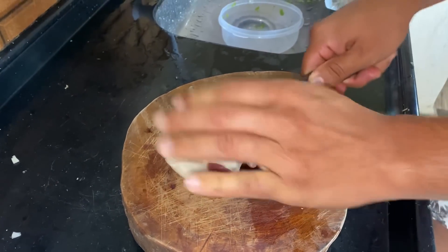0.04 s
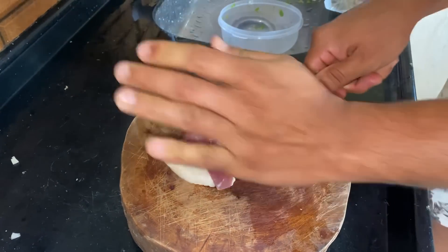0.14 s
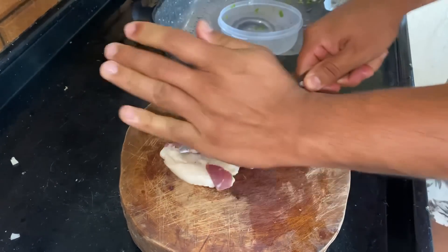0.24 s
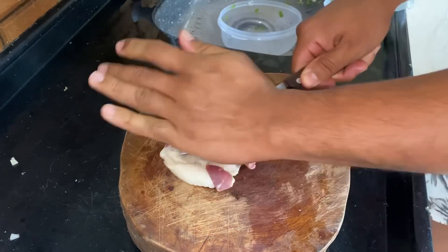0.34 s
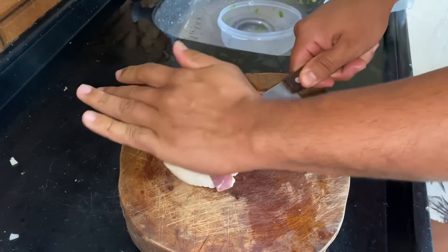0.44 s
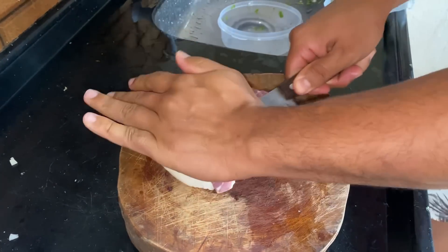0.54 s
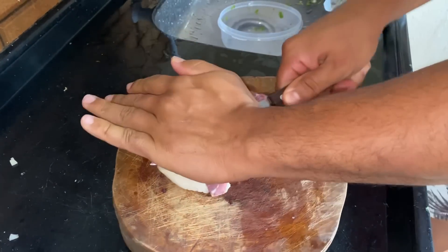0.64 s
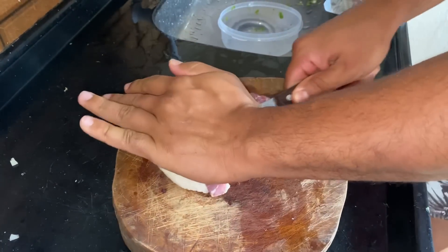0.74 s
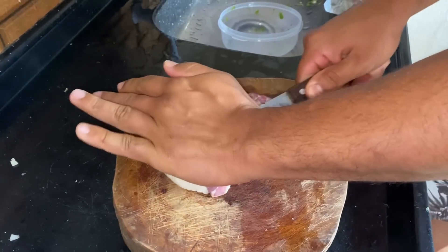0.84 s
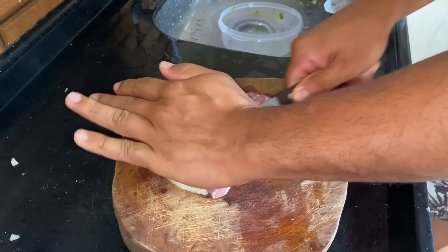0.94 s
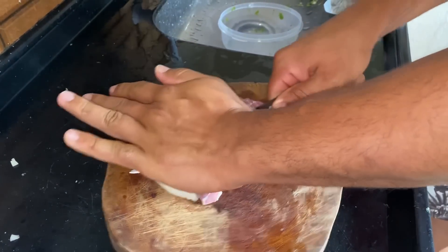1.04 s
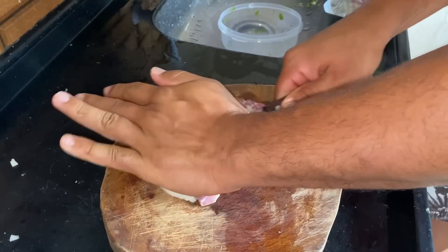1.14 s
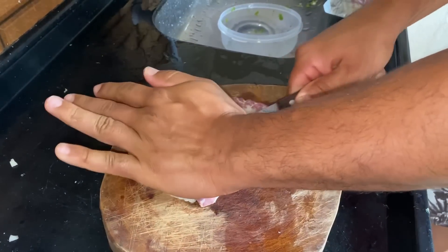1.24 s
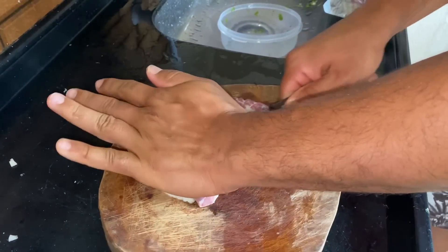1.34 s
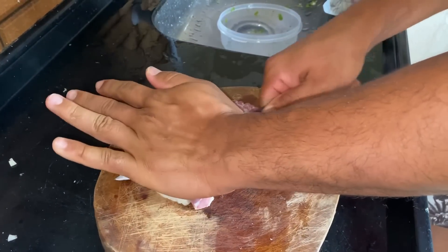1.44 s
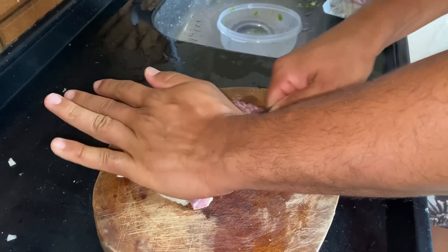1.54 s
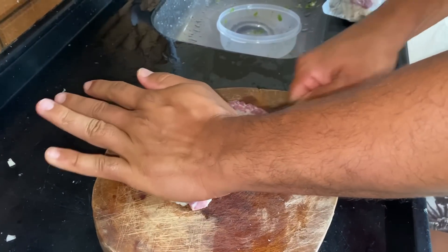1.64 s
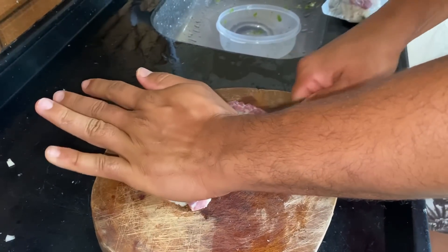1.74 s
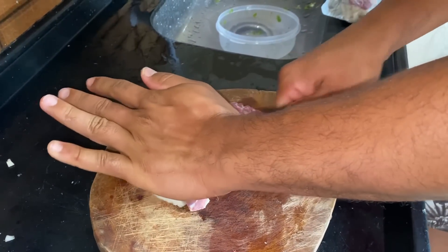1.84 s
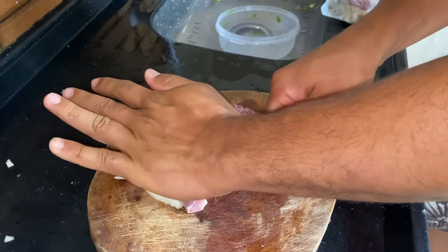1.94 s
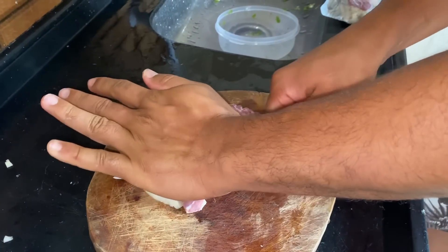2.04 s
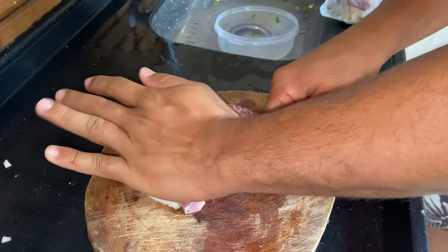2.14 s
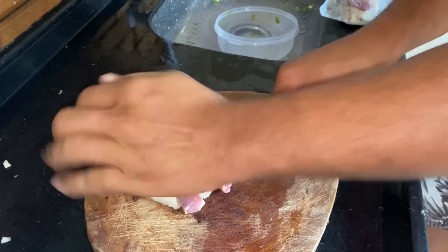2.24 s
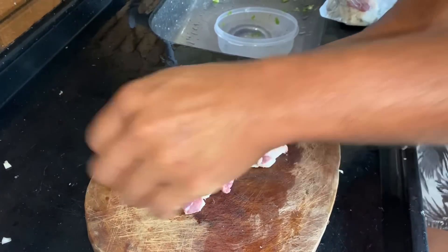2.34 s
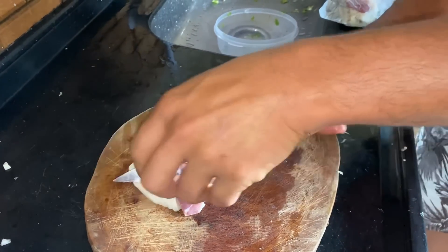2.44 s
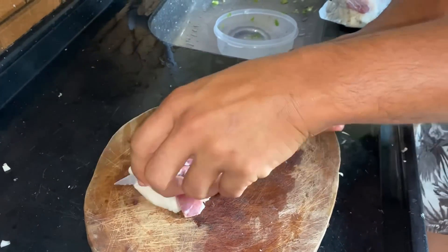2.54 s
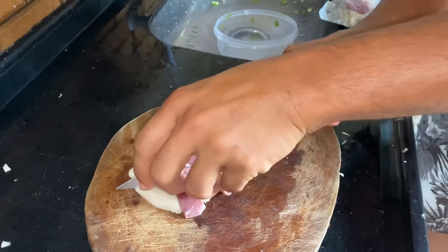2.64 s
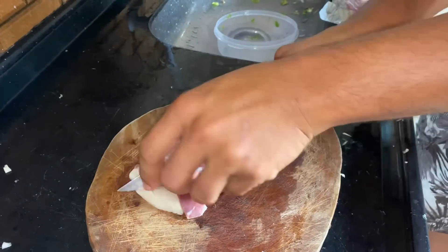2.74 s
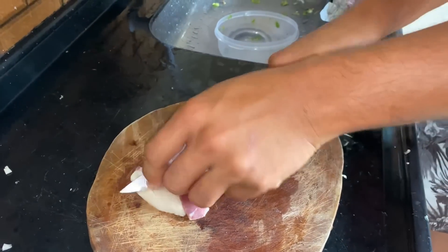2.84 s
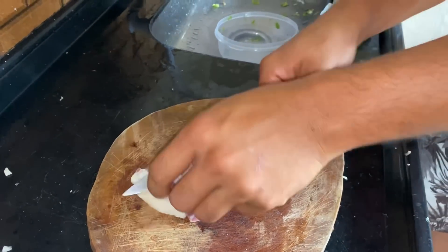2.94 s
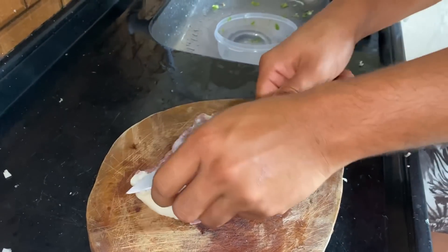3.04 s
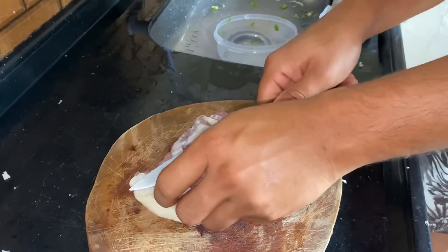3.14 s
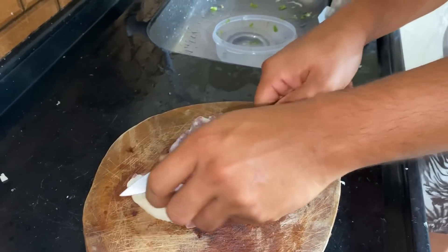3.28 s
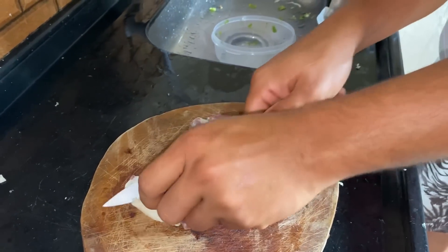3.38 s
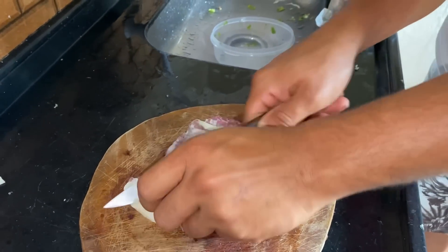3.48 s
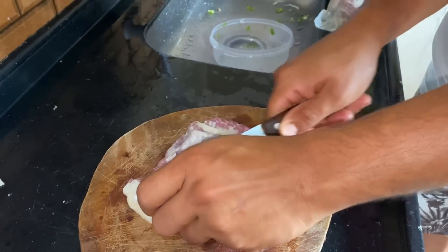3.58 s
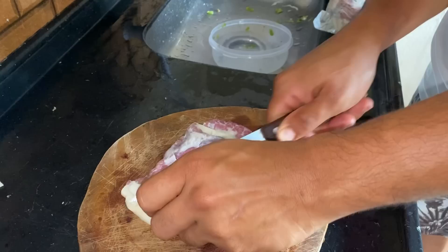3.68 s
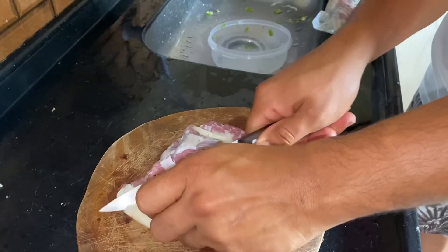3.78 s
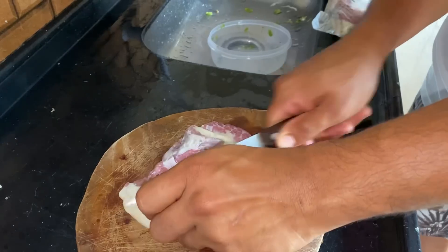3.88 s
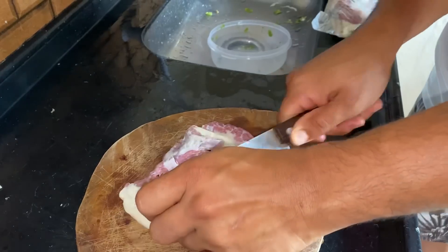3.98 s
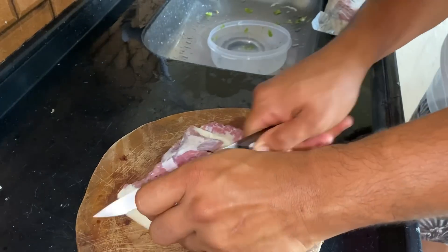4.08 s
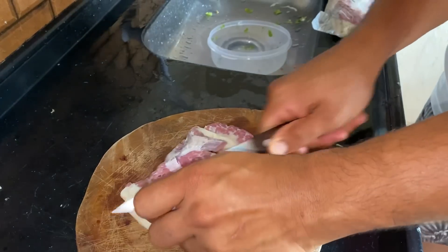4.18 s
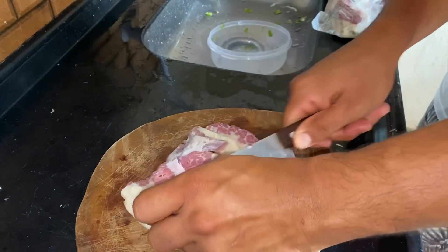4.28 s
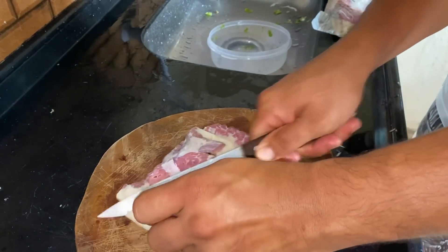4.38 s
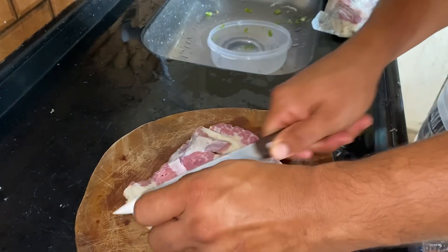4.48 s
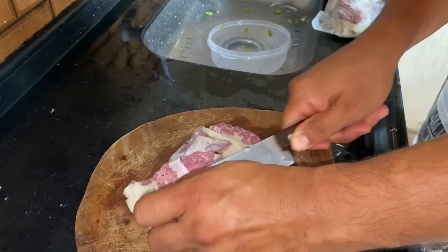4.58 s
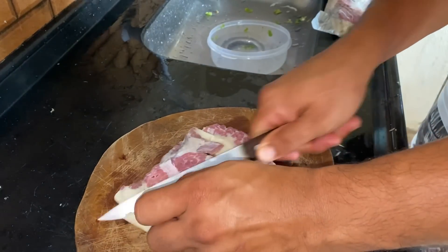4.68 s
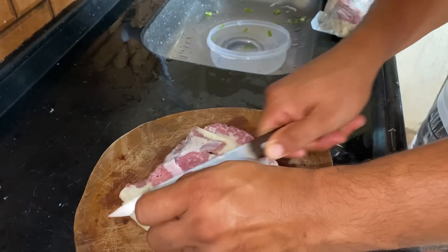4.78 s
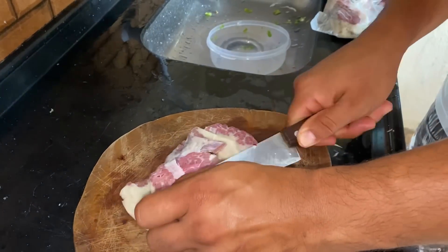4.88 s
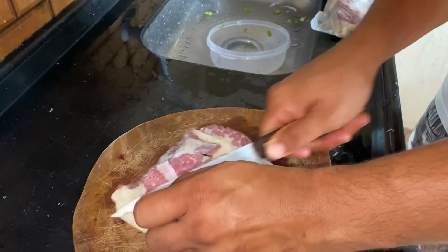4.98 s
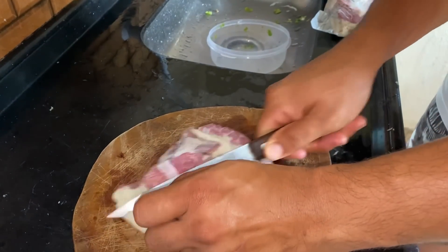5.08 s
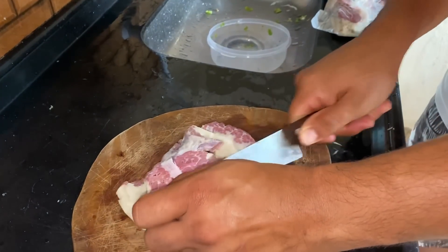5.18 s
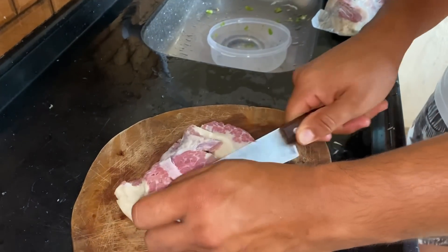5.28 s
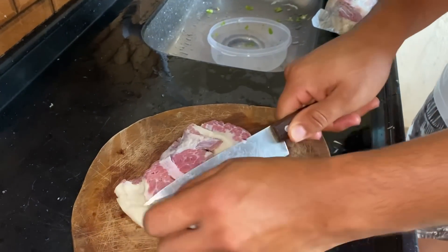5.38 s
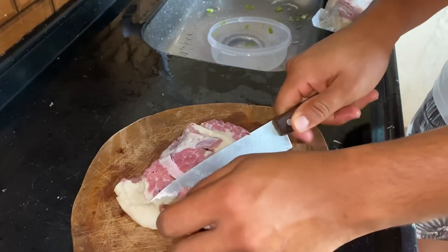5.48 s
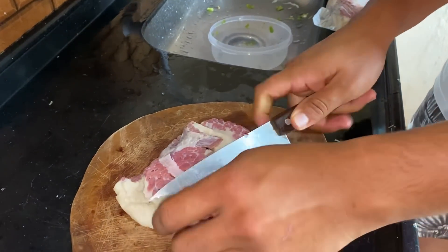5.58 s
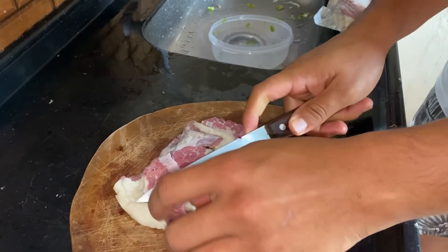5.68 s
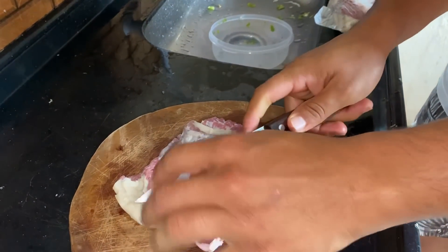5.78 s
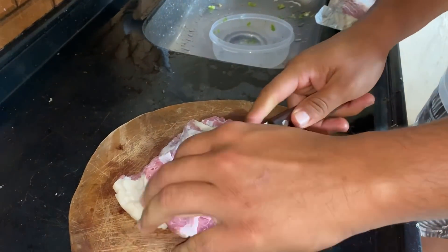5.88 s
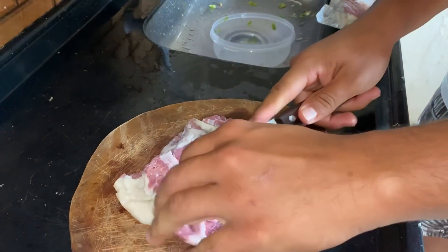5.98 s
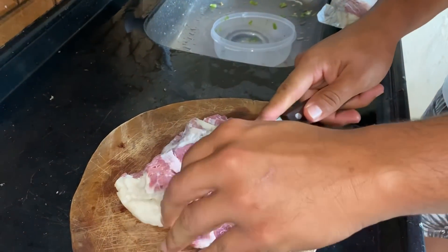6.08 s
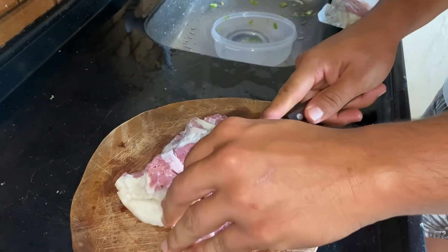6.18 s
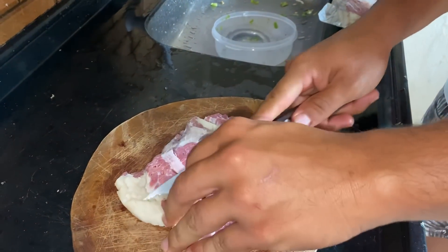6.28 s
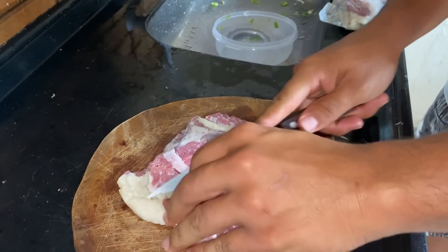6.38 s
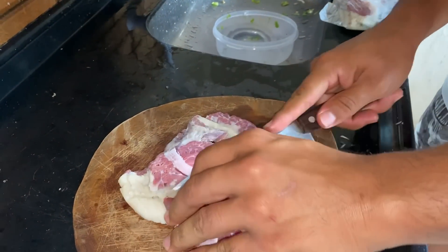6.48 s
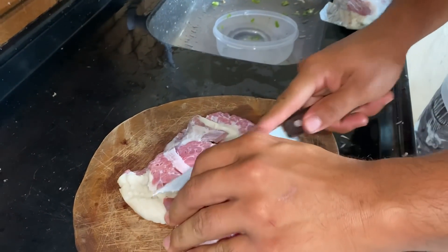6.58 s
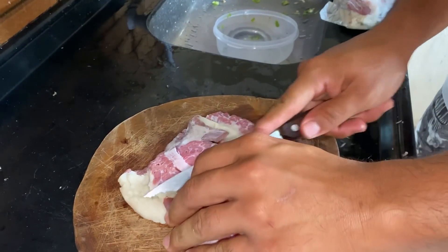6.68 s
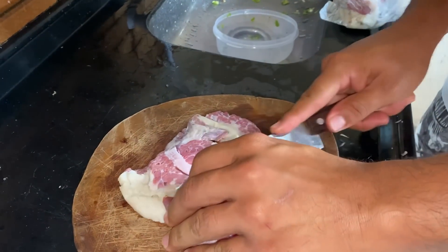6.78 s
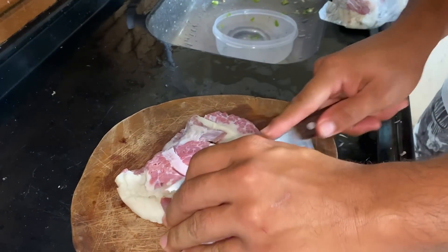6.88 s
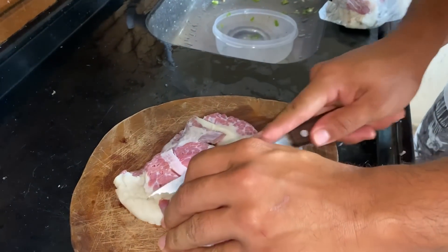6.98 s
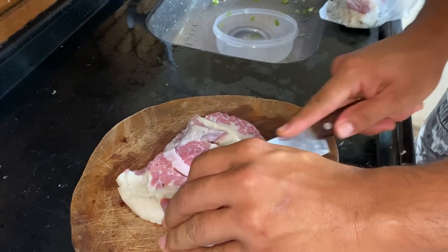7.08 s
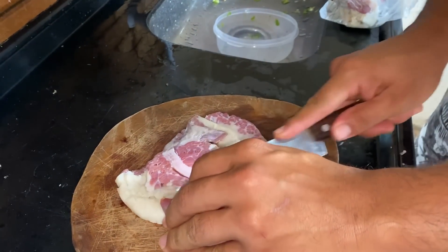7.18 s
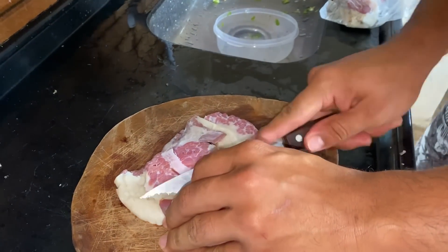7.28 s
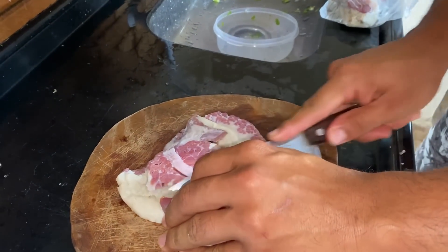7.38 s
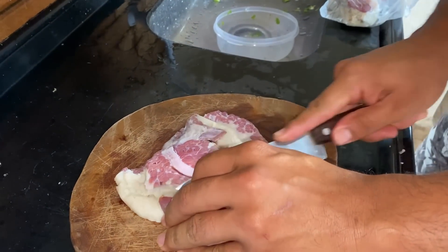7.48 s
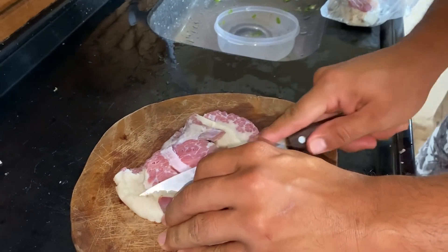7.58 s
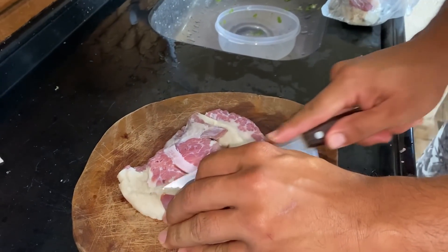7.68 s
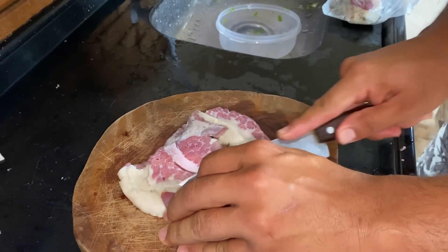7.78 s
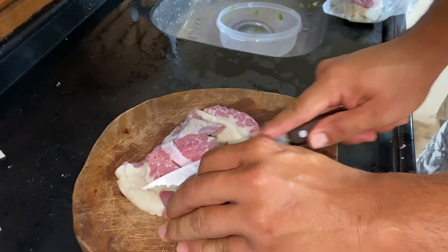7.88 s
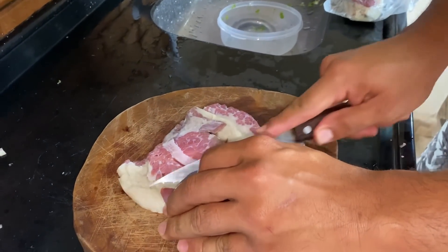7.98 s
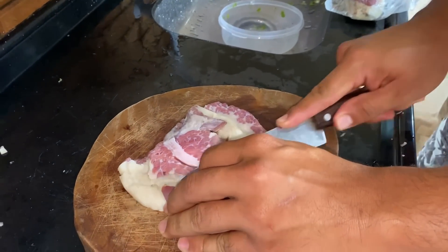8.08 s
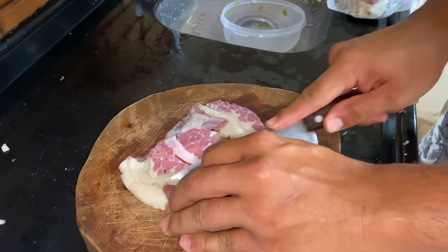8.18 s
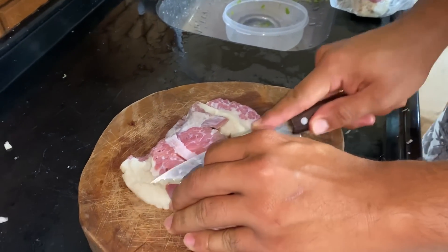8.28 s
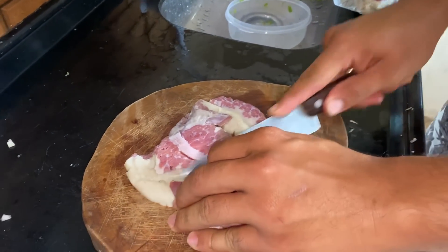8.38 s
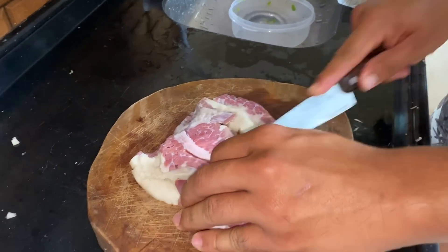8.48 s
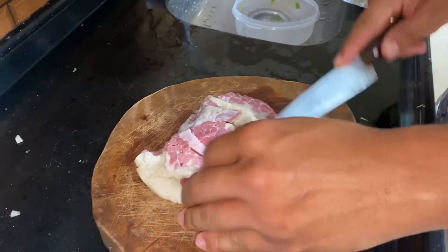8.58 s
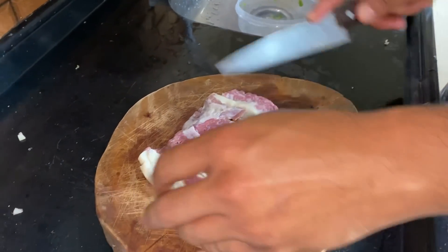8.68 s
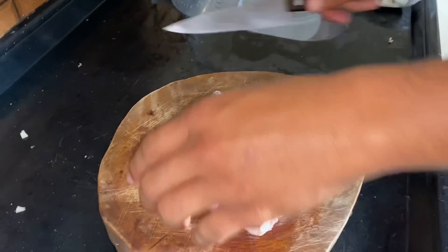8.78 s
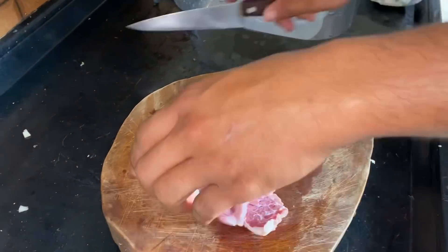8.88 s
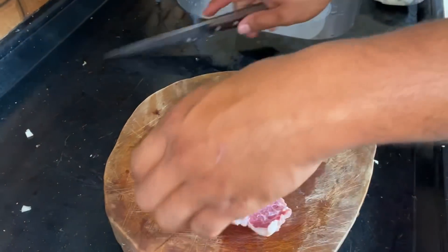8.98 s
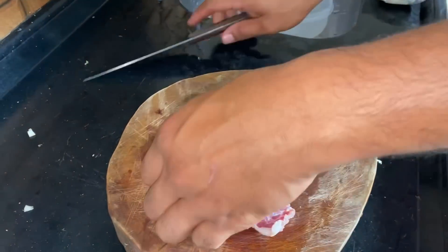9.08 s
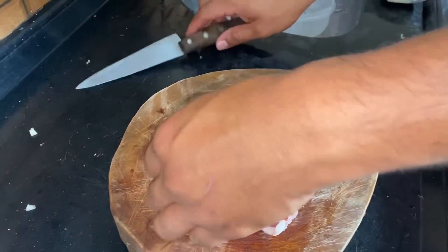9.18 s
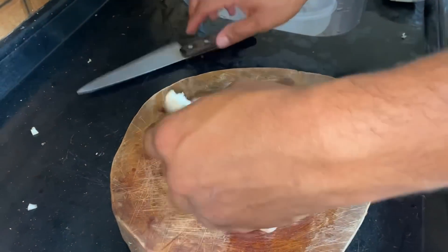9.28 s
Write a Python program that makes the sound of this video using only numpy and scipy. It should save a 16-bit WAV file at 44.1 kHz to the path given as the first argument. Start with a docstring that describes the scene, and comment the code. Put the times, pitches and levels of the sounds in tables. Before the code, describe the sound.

A steady, slightly surging wash of rain and simmering with fine sizzling drops runs throughout, heard by a close stereo phone microphone. From 0.6 to 1.9 s a knife saws meat in about seven low, dragging rasps with hoarse squeaks; hand rubs, wet squishes and firm board thuds cluster around 1.0 s. From 2.2 to 3.4 s the hand shifts its hold: soft rubs, sticky smacks, dull bumps. From 3.5 to 5.2 s come eleven faster, brighter tearing strokes, six per second, with short squeaks. Handling and thuds fill 5.3 to 6.0 s. A third run, 6.4 to 8.2 s, is thinner and higher, with fewer bumps. Rubs follow, then a double thud at 8.8 s. At 9.0 s the steel tip clinks, rings and skids on the counter; at 9.2 s the handle lands with the loudest, clipped knock, bouncing and rattling until 9.33 s, then fading into the hiss.

```python
"""Over a steady hiss of rain and a cooking pan, a hand takes hold of a slab of dried beef on a wooden board.
A kitchen knife saws it in three runs of strokes: noisy slips ring blade resonances, and some strokes squeak.
Between the runs the hand presses and shifts the slab, with noise-burst thuds, rubs, squishes and smacks.
Then the knife goes down on the counter: the tip rings, skids and chatters, the handle drops, bounces and
rattles, as clicks, clatter and struck modes. A phone close above overloads on the loudest of these knocks."""
import sys
import numpy as np
from scipy import signal
from scipy.fft import rfft, irfft, next_fast_len
from scipy.io import wavfile

SR = 44100
rng = np.random.default_rng(int(sys.argv[2]) if len(sys.argv) > 2 else 0)


def master(y):
    """Save y as 16-bit WAV."""
    cut = np.clip(np.atleast_2d(y).T, -1, 1)
    pcm = np.round(cut * 32767)  # scale
    wavfile.write(sys.argv[1], SR, pcm.astype(np.int16))


N = 411453
TIME = np.arange(N) / SR

# tearing fibres, tone curve: corner_hz, level_db
TEAR_TONE = [(500, -16), (1500, -1), (3000, -2), (4100, -3.5), (5500, -1), (7500, -2.5), (10500, 0.5),
             (12500, -5.5), (14000, -9), (15800, -16)]
# blade flat rubbing in the cut, tone curve: corner_hz, level_db
DRAG_TONE = [(150, -29), (350, 10.5), (700, -6), (1300, 5.5), (2500, -5.5), (3800, -3.5), (6000, -4.5),
             (9000, -32), (15000, -36)]
FIBRES_PER_S = 3000  # slips under the edge and along the flat


def sawing(strokes):
    """Snapping fibres ring a high blade resonance while the flat drags unevenly and squeaks in the cut."""
    fibre_rows = strokes[:, :4]
    drag_rows = strokes[:, [0, 1, 4, 5]]
    fibres = scrapes(fibre_rows, TEAR_TONE, q=6.7, focus=0.23, rate=FIBRES_PER_S)
    fibres *= undb(2.5 + 1.74 * walk(70) + 0.49 * walk(350))
    drag = scrapes(drag_rows, DRAG_TONE, q=4.3, focus=1.42, rate=FIBRES_PER_S)
    drag *= undb(1.5 + 3.7 * walk(50))
    cut = flicker(fibres + drag, depth_db=2.5, rate=30)
    return reflect(cut + squeaks(), db=-3, t60=0.2)


# pull and push strokes of the knife: middle_s, tear_level_db, tear_resonance_hz,
# drag_level_db, gripped_blade_resonance_hz, slab_rock_level_db
STROKES = [(0.609, -57.5, 4900, -48.5, 2190, -44), (.825, -62, 4900, -50.5, 2560, -50.5),
           (.985, -50.5, 4470, -44.5, 2570, -45), (1.215, -53.5, 5230, -46, 2550, -46.5),
           (1.421, -53.5, 5000, -45, 2360, -45.5), (1.635, -53.5, 4800, -44.5, 2530, -46),
           (1.841, -53.5, 4800, -47, 2460, -45.5), (3.555, -51.5, 6000, -50.5, 2820, -52),
           (3.73, -45, 6350, -54, 2920, -51), (3.895, -45.5, 6560, -48.5, 2780, -50),
           (4.055, -43.5, 6200, -51.5, 3600, -50), (4.205, -47, 6400, -53, 2640, -47.5),
           (4.36, -46.5, 5700, -50, 2570, -55), (4.504, -50, 5200, -54.5, 2300, -47.5),
           (4.669, -48.5, 5500, -51.5, 2400, -59), (4.83, -48.5, 6200, -54, 2680, -57),
           (4.981, -47.5, 6500, -48.5, 2120, -58), (5.16, -50.5, 6570, -49.5, 2160, -54),
           (6.434, -55.5, 7500, -49.5, 1920, -66), (6.6, -47.5, 7400, -48, 2080, -67),
           (6.734, -48, 6960, -50, 2040, -64), (6.905, -50, 7200, -48.5, 2100, -68),
           (7.065, -50, 7100, -51.5, 2090, -52), (7.231, -48.5, 7000, -54, 1950, -63),
           (7.375, -48.5, 7100, -49, 2100, -57), (7.544, -48, 7200, -49, 1950, -58),
           (7.694, -51, 7240, -47.5, 2380, -60), (7.861, -51.5, 7100, -48.5, 1800, -50),
           (8.03, -54, 7000, -48.5, 2510, -55), (8.2, -58, 7000, -53.5, 1780, -62)]
STROKE_SHARE = 0.82  # length of a stroke as a share of the gap to its nearest neighbour


def saw_strokes():
    """The blade slides for most of the time between strokes: each row gains its length_s after its middle_s."""
    rows = np.array(STROKES, float)
    gaps = np.diff(rows[:, 0])
    gap_after = np.append(gaps, np.inf)
    gap_before = np.append(np.inf, gaps)
    lengths = STROKE_SHARE * np.minimum(gap_after, gap_before)
    return np.column_stack([rows[:, 0], lengths, rows[:, 1:]])


# the blade catches in the cut and squeaks hoarsely: middle_s, length_s, level_db, pitch_hz, glide_octaves
SQUEAKS = [(.825, .11, -47, 2550, 0.16), (1.202, .08, -45, 2450, 0), (1.032, .06, -47, 1870, .2),
           (1.631, 0.094, -47, 2530, .1), (1.635, 0.078, -50, 5000, -.1), (3.904, .07, -48, 2860, .1),
           (4.045, 0.12, -45, 2650, 0.032), (4.133, 0.036, -48.5, 1950, -.2), (4.228, 0.054, -47, 2640, 0),
           (4.347, .07, -45, 2600, .1), (4.505, .07, -49, 4950, -.1), (4.693, 0.042, -46, 2150, -.2),
           (4.825, .05, -48, 2720, .1), (4.962, 0.057, -45.5, 2670, -.1), (4.999, .07, -51, 1900, -.2),
           (6.455, 0.054, -49, 2010, -0.032), (7.102, .11, -45, 2040, 0.47), (7.21, 0.055, -50, 2500, 0),
           (7.369, .06, -48, 1820, -0.066), (7.701, 0.11, -45, 1950, .1), (8.07, 0.063, -48, 1850, 0)]
SQUEAK_Q, SQUEAK_ROUGH_DB = 7.2, 3


def squeaks():
    """Steel sticks and slips on wet fat: a narrow, rough resonance that slides as the grip changes."""
    out = np.zeros(N)
    for middle, length, db, hz, octaves in SQUEAKS:
        progress = np.linspace(0, 1, int(length * SR))
        pitch = hz * 2 ** (octaves * (progress - .5))
        slips = resonate(rng.standard_normal(len(progress)), pitch, SQUEAK_Q)
        tone = resonate(slips, pitch, SQUEAK_Q / 2)
        add(out, middle - length / 2, undb(db) * np.sin(np.pi * progress) * tone)
    return out * undb(SQUEAK_ROUGH_DB * walk(180) - 1.5)


# soft hollow rubs as the hand takes a new hold: middle_s, length_s, level_db, resonance_hz
HAND_RUBS = [(.265, 0.077, -51, 1200), (1.035, 0.12, -41, 1200), (1.04, 0.058, -42, 3000),
             (1.41, 0.24, -45.5, 1250), (2.2, 0.15, -48.5, 2350), (2.33, 0.21, -46.5, 520),
             (2.46, 0.093, -45.5, 1050), (2.9, 0.2, -52, 1100), (3.4, 0.29, -49.5, 623),
             (5.49, 0.15, -48, 895), (5.665, 0.064, -47, 1700), (5.85, 0.097, -55, 2980),
             (6.02, 0.11, -53, 3900), (8.32, 0.16, -48, 750), (8.45, 0.17, -50, 2600),
             (8.836, 0.027, -37, 885), (8.832, 0.013, -39, 4300)]
# small wet pockets squeezed shut in the meat: middle_s, length_s, level_db, resonance_hz
SQUISHES = [(.49, 0.036, -46, 1200), (.905, 0.05, -46, 660), (1.02, .04, -44, 860),
            (1.05, 0.043, -38, 1260), (1.335, 0.027, -45, 980), (2.29, 0.036, -48, 523),
            (2.345, 0.045, -46, 605), (3.455, 0.07, -49, 550), (3.655, 0.24, -50, 600),
            (3.96, 0.16, -45.5, 1150), (5.005, 0.07, -47, 750), (5.945, 0.089, -44.5, 623),
            (6.02, 0.15, -44.5, 1380), (6.65, 0.079, -48, 1150), (7.47, 0.054, -45, 1150),
            (7.955, 0.089, -48, 1400), (8.49, 0.1, -45, 1430)]
# tone curve of skin rubs and squishes: corner_hz, level_db
SKIN_TONE = [(150, -35), (350, 3), (600, -1), (1200, -1), (2000, -2.5), (5000, -9.5), (14000, -28)]
# sticky smacks as the fingers come off the meat: start_s, level_db, resonance_hz
SMACKS = [(2.256, -44, 1660), (2.338, -45, 1690), (2.436, -44, 1310), (2.795, -38.5, 960),
          (2.797, -43.5, 1730), (2.845, -46, 900), (2.88, -54, 830), (2.919, -45, 1200), (3.147, -43, 1640),
          (5.624, -42, 620), (5.628, -41.5, 1390), (5.812, -52, 3100), (5.862, -45.5, 2900),
          (5.978, -46, 3580)]
SMACK_T60_S, SMACK_Q = .11, 12
# hand and blade bumping the board through the meat: start_s, level_db, decay_t60_s, contact_cutoff_hz
BOARD_THUDS = [(.682, -36.5, 0.27, 900), (1.005, -36, 0.18, 1200), (1.035, -31.5, 0.39, 1100),
               (1.095, -32.5, 0.13, 800), (1.36, -45, 0.28, 600), (1.51, -45, 0.15, 400),
               (2.191, -43, 0.2, 300), (2.593, -47, 0.086, 250), (3.328, -37, 0.41, 120),
               (4.727, -44, 0.12, 350), (5.32, -37, 0.078, 200), (5.74, -37.5, .12, 260),
               (5.88, -44, 0.71, 200), (8.786, -38.5, 0.68, 200), (8.84, -32, 0.18, 200),
               (8.862, -30, 0.15, 195)]
# dull body of a thud, tone curve: corner_hz, level_db
THUD_TONE = [(25, -34), (60, -3), (105, -3), (160, 0), (230, -5), (330, -4), (550, -21), (1500, -26),
             (5000, -55)]
# ring of the wooden board: mode_hz, level_db, decay_t60_s
BOARD_MODES = [(123, -2, 0.18), (152.6, -4.5, 0.2), (337, -1, 0.076), (398, -4, 0.11)]
# the slab rocks just before the middle of each stroke
ROCK_T60_S, ROCK_CONTACT_HZ, ROCK_LEAD_S = 0.61, 604, 0.023


def hands(strokes):
    """Skin rubs, meat squishes and smacks; pushes and strokes reach the heavy board as dull, briefly ringing thuds."""
    out = scrapes(HAND_RUBS, SKIN_TONE, q=1.66, focus=1.4) * undb(2.2 * walk(54))
    out += scrapes(SQUISHES, SKIN_TONE, q=7.4, focus=3.0, glide=0.076, peak_share=0.46)
    for s, db, hz in SMACKS:
        add(out, s, undb(db) * ping(hz, SMACK_Q, SMACK_T60_S))
    rocks = [(s - ROCK_LEAD_S, db, ROCK_T60_S, ROCK_CONTACT_HZ) for s, db in strokes[:, [0, 6]]]
    t = TIME[:SR // 3]
    for s, db, t60, contact_hz in list(BOARD_THUDS) + rocks:
        squash = colour(rng.standard_normal(len(t)), THUD_TONE) * fade(t, t60)
        board = undb(-4) * ring(BOARD_MODES, t, 0, scatter_db=-2.0, detune=0.019)
        thud = (squash + board) * (1 - fade(t, 0.0066))  # soft onset
        contact = signal.butter(2, contact_hz, fs=SR)
        add(out, s, undb(db) * signal.lfilter(*contact, thud))
    return out


# the tip skids on the counter: middle_s, length_s, level_db, resonance_hz
TIP_SKIDS = [(9.095, 0.18, -36.5, 290), (9.09, 0.13, -34, 940), (9.07, .13, -39, 4400),
             (9.095, .11, -41, 6400)]
# ring of the counter: mode_hz, level_db, decay_t60_s
COUNTER_MODES = [(165, -3, 0.16), (195, -1, 0.072), (336, -6, 0.11), (408.6, -1, 0.11), (491, -14.5, 0.12),
                 (557, -8.5, 0.13), (634, -12, 0.14), (714, -11, 0.2), (1020, -3.5, 0.11), (1052, -6, 0.1),
                 (1166, -8, 0.1), (1250, -6, 0.18), (1350, -3.5, 0.16), (1572, -9, 0.089), (1622, -3, 0.14),
                 (1790, -4, 0.19), (2012, -7, .08), (2200, -7, .06), (2290, -5.5, 0.093), (2590, -2, 0.15),
                 (2720, -7, 0.077), (3130, -9, 0.26), (3290, -9, .05), (3582, -6.5, 0.11), (4280, -12, .05),
                 (4640, -10, 0.09)]
# ring of the blade: mode_hz, level_db, decay_t60_s
BLADE_MODES = [(346, 0, 0.13), (416, 3.5, 0.1), (633, -6, 0.32), (703, -12, 0.28), (1038, -4, 0.19),
               (1090, -1, 0.1), (1450, -8, 0.19), (1500, -12, 0.29), (2110, -18, 0.19), (2510, -20, 0.19),
               (3150, -20, 0.41), (3300, -9, 0.16), (3630, -7, 0.15), (4480, -12, .18), (4540, -13, .18),
               (4700, -10, .16), (5300, -7, .13), (5400, -8, .13), (5600, -19, .15), (6557, -2.5, 0.099),
               (7680, -5, 0.097), (9000, -5.5, 0.15), (9200, -10, .15), (10400, -1, 0.072),
               (10760, -12, 0.18), (13400, -9, 0.092), (14300, -13, 0.16)]
CLICK_DB, CLICK_T60_S, CLICK_Q = 3, 0.018, 3.9  # the brief local ring at the point of contact


def knife_down(blows, phase):
    """Each blow clicks and rings counter and blade over a short dense clatter with a faint long tail."""
    out = scrapes(TIP_SKIDS, CLATTER_TONE, q=4.7, focus=2.7)
    t = TIME[:SR // 3]
    for s, db, contact_hz, click_hz, counter_db, blade_db, spectrum in blows:
        clatter_and_tail = undb(1.0) * fade(t, 0.036) + undb(-20) * fade(t, 0.94)
        clatter = colour(rng.standard_normal(len(t)), spectrum) * clatter_and_tail
        click = undb(CLICK_DB) * ping(click_hz, CLICK_Q, CLICK_T60_S)
        counter = undb(counter_db) * ring(COUNTER_MODES, t, phase, scatter_db=1.0, detune=0.0029)
        blade = undb(blade_db) * ring(BLADE_MODES, t, phase, scatter_db=2.5, detune=0.006)
        # the plate takes a moment to start moving
        knock = (click + clatter + counter + blade) * (1 - fade(t, 0.0016))
        contact = signal.butter(1, [60, contact_hz], "bandpass", fs=SR)
        add(out, s, undb(db) * signal.lfilter(*contact, knock))
    return out


# the steel tip meets the counter: start_s, force_db, click_pitch_hz
TIP_BLOWS = [(8.9984, -14, 7100), (9.004, -24, 1110), (9.034, -21, 4500), (9.04, -24, 3500),
             (9.06, -31, 4500), (9.074, -32, 3300), (9.085, -32, 1100), (9.102, -27.5, 5400),
             (9.108, -30, 1100), (9.12, -31.5, 6600), (9.14, -43, 4500), (9.162, -44, 1400)]
# clatter of the tip, tone curve: corner_hz, level_db
TIP_TONE = [(30, -20), (70, 3), (260, 8.5), (400, 0), (800, 0.5), (1300, 4.5), (2000, -5), (2800, -9),
            (3300, -4.5), (6400, -9.5), (7400, -14), (11000, -16), (15000, -21)]
# hardness of the tip, and how much it rings counter and blade
TIP_CONTACT_HZ, TIP_COUNTER_DB, TIP_BLADE_DB = 12000, -16.5, -6.5
# the handle drops, bounces and chatters: start_s, force_db, contact_cutoff_hz, click_pitch_hz
HANDLE_BLOWS = [(9.2162, 0.5, 704, 1060), (9.2205, -5.5, 3160, 2880), (9.232, -7, 490, 450),
                (9.2739, -3, 1900, 1260), (9.2793, -8.5, 1700, 1150), (9.2937, -3, 6000, 2200),
                (9.2971, -13, 4500, 5000), (9.303, -17, 6000, 4330), (9.309, -23, 3000, 2000),
                (9.321, -15, 2300, 2600), (9.326, -18, 2000, 1100)]
# clatter of the handle and hiss of the skid, tone curve: corner_hz, level_db
CLATTER_TONE = [(30, -23), (70, -1), (110, 0), (260, -2), (400, -5), (800, 0), (1200, 2), (2400, -2.5),
                (4000, -4), (6800, -8.5), (9000, -10), (15000, -27)]
# how much the handle rings the counter (in a flat landing) and the blade
HANDLE_COUNTER_DB, HANDLE_BLADE_DB = -6.5, -38
# a blow harder than a flat landing glances off and rings the counter less
FLAT_CONTACT_HZ, GLANCE_DB_PER_OCTAVE = 990, 2


def knife_blows():
    """The hard tip rings mostly the blade, the softer handle mostly the counter; rows as knife_down unpacks them."""
    tip = [(s, db, TIP_CONTACT_HZ, click_hz, TIP_COUNTER_DB, TIP_BLADE_DB, TIP_TONE)
           for s, db, click_hz in TIP_BLOWS]
    handle = []
    for s, db, contact_hz, click_hz in HANDLE_BLOWS:
        glance_db = GLANCE_DB_PER_OCTAVE * np.log2(contact_hz / FLAT_CONTACT_HZ)
        counter_db = HANDLE_COUNTER_DB - glance_db
        handle.append((s, db, contact_hz, click_hz, counter_db, HANDLE_BLADE_DB, CLATTER_TONE))
    return tip + handle


# wash of rain and simmering, tone curve: corner_hz, level_db
WASH_TONE = [(20, -30), (50, 2.5), (68, 4), (90, -9.5), (120, 2), (200, -9), (260, -6), (330, -5.5),
             (390, -3), (460, -7.5), (850, -8.5), (1030, -4), (1200, -8.5), (1500, -7), (1720, -6),
             (2080, -12.5), (2300, -9.5), (2600, -12), (4300, -18), (8000, -21.5), (11500, -21),
             (13000, -27.5), (15500, -34)]


def rain():
    """A noise wash of rain and simmering surges, most unevenly in the middle range, under a fine sizzle of drops."""
    wash = flicker(colour(rng.standard_normal(N), WASH_TONE), depth_db=2.5, rate=12)
    wash *= undb(.5 * walk(3.97))
    drop_tone = [(400, -24), (1500, 11.5), (4000, -4), (11000, -2.5), (15500, -30)]  # corner_hz, level_db
    drops = colour(crackle(rate=900, spread_db=-1.0), drop_tone)
    return undb(-47.5) * wash + undb(-58.5) * drops


def scrapes(rows, spectrum, q, focus, rate=6000, glide=0.046, peak_share=0.43):
    """Dense slips ring a sliding resonance per row (middle_s, length_s, level_db, hz), swelling with hand speed."""
    out = np.zeros(N)
    slips = colour(crackle(rate=rate, spread_db=1), spectrum)
    for middle, length, db, hz in rows:
        near = np.abs(TIME - middle) < length / 2
        progress = (TIME[near] - middle) / length + .5
        speed = np.sin(np.pi * np.interp(progress, [0, peak_share, 1], [0, .5, 1]))
        pitch = hz * np.exp(glide * rng.uniform(-1.3, 1) * (2 * progress - 1))
        body = resonate(slips[near], pitch, q)
        out[near] += undb(db) * speed * (slips[near] + focus * body) / (1 + focus)
    return out


def ring(modes, t, phase, scatter_db, detune):
    """Struck modes; each point of contact weights and loads them a little differently."""
    out = np.zeros(len(t))
    for k, (hz, db, t60) in enumerate(modes):
        gain = undb(db + scatter_db * rng.standard_normal()) * (-1) ** k
        loaded_hz = hz * (1 + detune * rng.standard_normal())
        out += gain * fade(t, t60) * np.sin(2 * np.pi * loaded_hz * t + phase)
    return out


def ping(hz, q, t60):
    """A decaying burst of noise in one resonance."""
    t = TIME[:SR // 3]
    return resonate(rng.standard_normal(len(t)), np.full(len(t), hz), q) * fade(t, t60)


def resonate(x, hz, q):
    """One resonance whose pitch hz may move, scaled to unit spread."""
    turn = np.exp(2j * np.pi * np.cumsum(hz) / SR)
    pole = np.exp(-np.pi * hz.mean() / q / SR)
    # shift the pitch down to zero, smooth, and shift back up
    y = (signal.lfilter([1], [1, -pole], x / turn) * turn).real
    return y / y.std()


def crackle(rate, spread_db):
    """Random tiny clicks of scattered size, about rate per second, scaled to unit spread."""
    sizes = rng.standard_normal(N) * undb(spread_db * np.minimum(rng.exponential(size=N), 4))
    clicks = sizes * (rng.random(N) < rate / SR)
    return clicks / clicks.std()


def flicker(x, depth_db, rate):
    """Each third-octave band between the two end bands swells and sinks on its own."""
    size = next_fast_len(N)
    hz = np.fft.rfftfreq(size, 1 / SR)
    position = np.clip(3 * np.log2((hz + 1) / 250), 0, 12)  # thirds of an octave above 250 Hz
    spectrum = rfft(x, size)
    bands = [irfft(spectrum * np.maximum(1 - np.abs(position - k), 0), size)[:N] for k in range(13)]
    moving = sum(band * undb(depth_db * walk(rate)) for band in bands[1:-1])
    return bands[0] + bands[-1] + moving


def reflect(x, db, t60):
    """Counter top and near walls return a dense cluster of echoes."""
    t = TIME[:SR // 4]
    echoes = rng.standard_normal(len(t)) * fade(t, t60)
    wet = signal.oaconvolve(x, echoes / np.linalg.norm(echoes))[:N]
    return (x + undb(db) * wet) / np.hypot(1, undb(db))


def colour(x, spectrum):
    """Shape x by a tone curve, keeping the power of white noise."""
    size = next_fast_len(len(x))
    gain = undb(along(spectrum, np.fft.rfftfreq(size, 1 / SR)))
    gain /= np.sqrt(np.mean(gain ** 2))
    return irfft(rfft(x, size) * gain, size)[:len(x)]


def along(table, hz):
    """Read (Hz, value) points on a log-frequency axis."""
    points, values = np.transpose(table)
    return np.interp(np.log(hz + 1), np.log(points), values)


def walk(rate):
    """A random control curve joining rate normal draws per second by straight lines."""
    knots = rng.standard_normal(N // 40)
    return np.interp(TIME * rate, np.arange(len(knots)), knots)


def fade(t, t60):
    """Exponential decay by 60 dB in t60 seconds."""
    return np.exp(-np.log(1000) * t / t60)


def undb(db):
    """Decibels to gain."""
    return 10 ** (np.asarray(db) / 20)


def add(track, s, sound):
    """Mix a sound into a track at time s."""
    start = int(s * SR)
    track[start:start + len(sound)] += sound[:max(N - start, 0)]


# how alike the two ports hear the scene: corner_hz, correlation
LIKENESS = [(60, 0.95), (200, 0.92), (420, 0.65), (700, 0.23), (1400, 0.0096), (2800, 0.32), (6500, 0.43),
            (8500, 0.88), (12000, 1)]


def scene():
    """Two renderings with separate random draws, as middle and side, set how alike the ports sound by pitch."""
    strokes, blows = saw_strokes(), knife_blows()

    def render(phase):
        """Mix every source, with struck modes starting at this phase."""
        background = reflect(rain(), db=-8, t60=0.14)
        return sawing(strokes) + hands(strokes) + knife_down(blows, phase) + background

    size = next_fast_len(N + SR // 10)
    alike = along(LIKENESS, np.fft.rfftfreq(size, 1 / SR))
    mid = rfft(render(0), size) * np.sqrt((1 + alike) / 2)
    side = rfft(render(np.pi / 2), size) * np.sqrt((1 - alike) / 2)
    return irfft([mid + side, mid - side], size)[:, :N]


# the ports face different ways: corner_hz, left_minus_right_db
PORT_BALANCE = [(200, -0.5), (500, -3), (750, 0.5), (1200, -1.5), (2500, 1), (5500, 3), (8500, 0)]
PORT_LAG_S, PORT_SPLIT_HZ = .000281, 6720  # the left port lags above the split
TOP_HZ = 15600  # upper limit of the phone


def record(dry):
    """The ports differ in colour and the left one's top treble lags; the loudest knocks clip; the top is cut."""
    size = next_fast_len(N + SR // 10)
    hz = np.fft.rfftfreq(size, 1 / SR)
    lag = np.exp(-2j * np.pi * np.maximum(hz - PORT_SPLIT_HZ, 0) * PORT_LAG_S)
    lean = undb(along(PORT_BALANCE, hz) / 2)  # half the difference on each side
    ports = irfft(rfft(dry, size) * np.array([lag * lean, 1 / lean]), size)[:, :N]
    overloaded = np.clip(ports, -1, 1)
    top_cut = signal.ellip(10, .2, 80, TOP_HZ, fs=SR, output="sos")
    return signal.sosfilt(top_cut, overloaded)


dry = scene()
out = record(dry)
master(out)
```